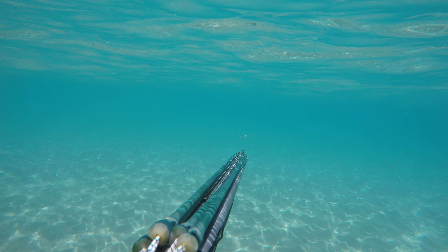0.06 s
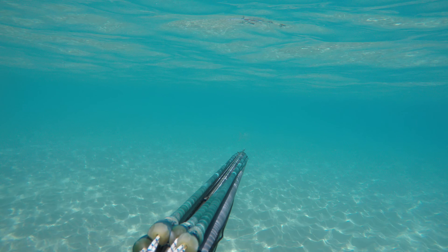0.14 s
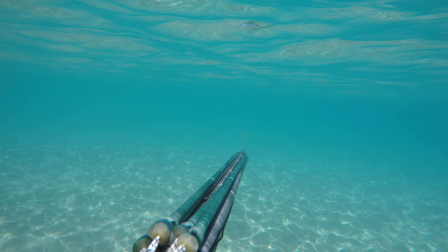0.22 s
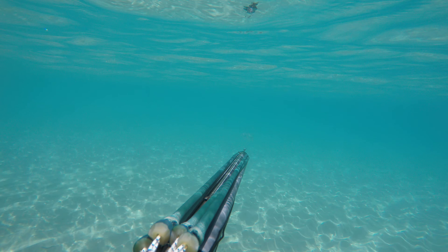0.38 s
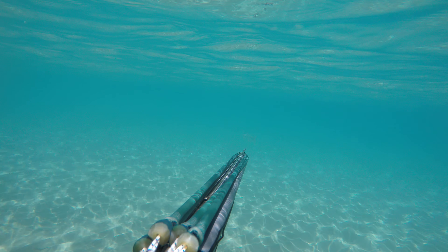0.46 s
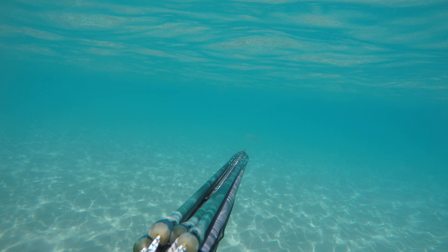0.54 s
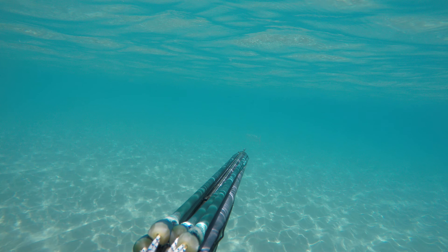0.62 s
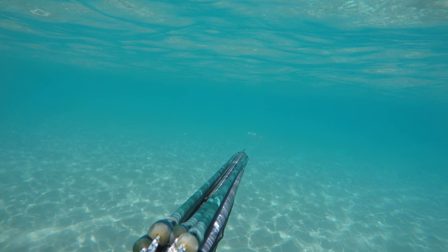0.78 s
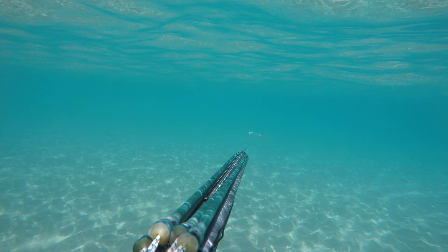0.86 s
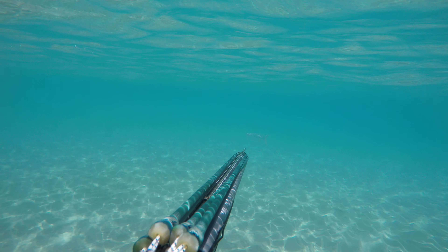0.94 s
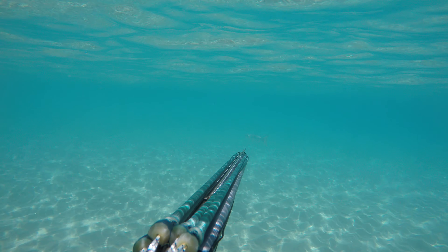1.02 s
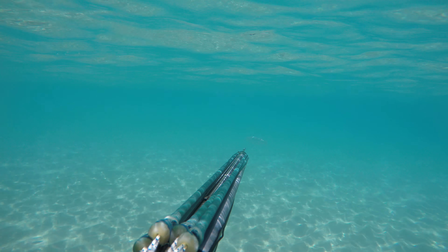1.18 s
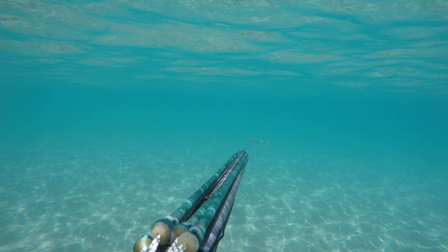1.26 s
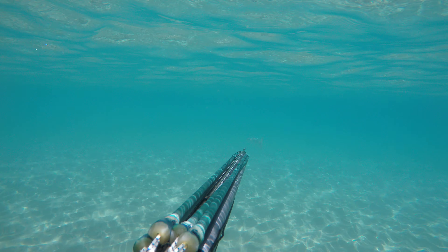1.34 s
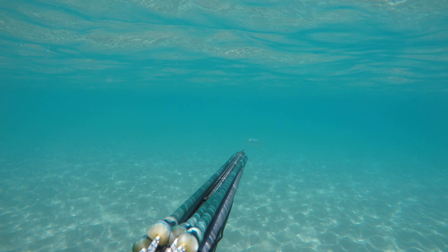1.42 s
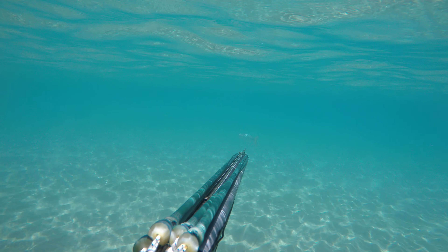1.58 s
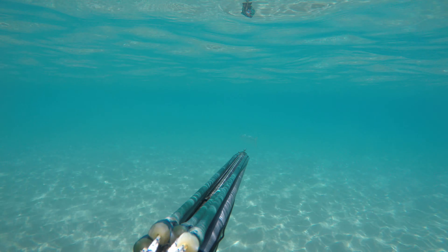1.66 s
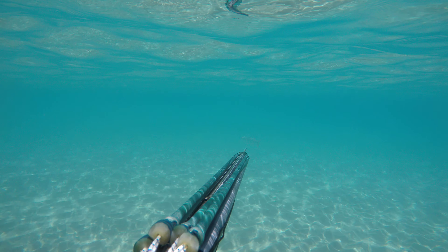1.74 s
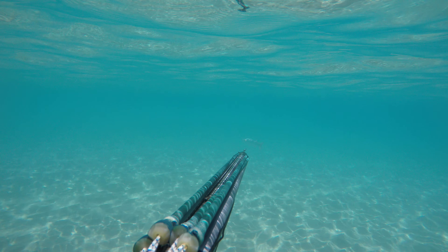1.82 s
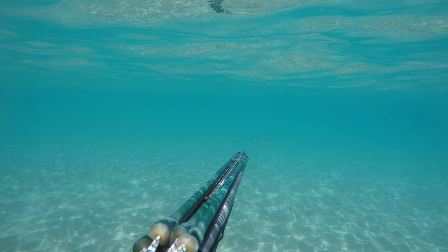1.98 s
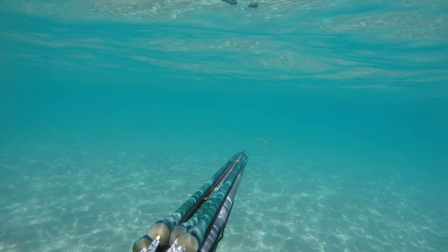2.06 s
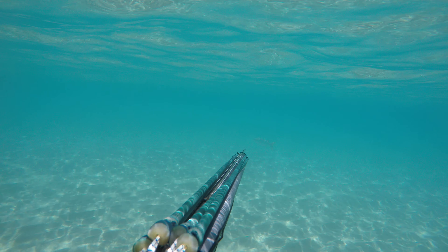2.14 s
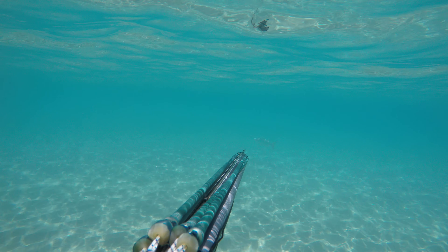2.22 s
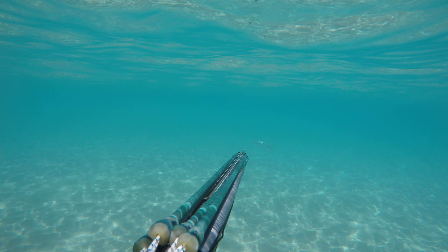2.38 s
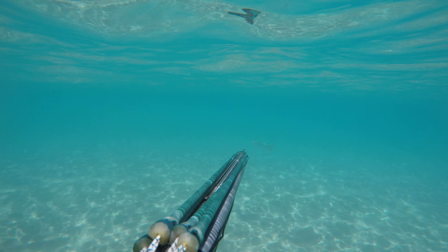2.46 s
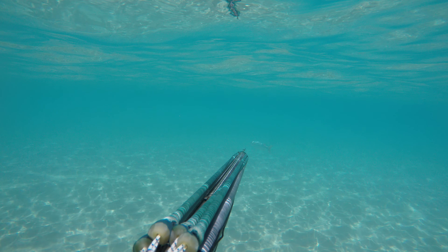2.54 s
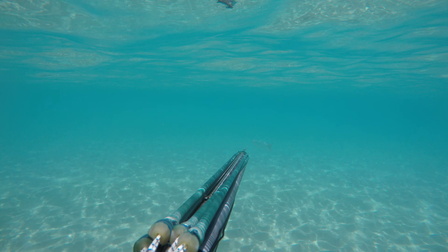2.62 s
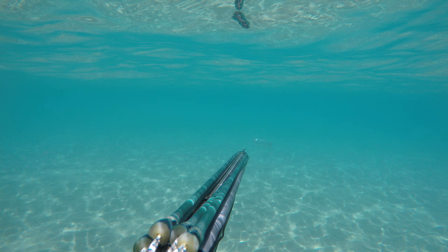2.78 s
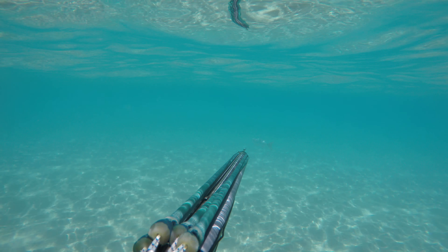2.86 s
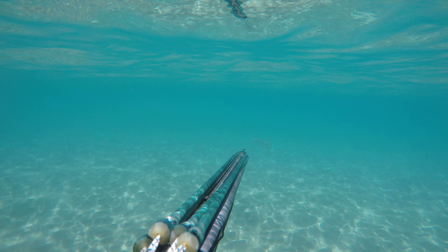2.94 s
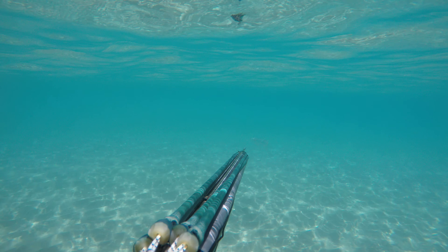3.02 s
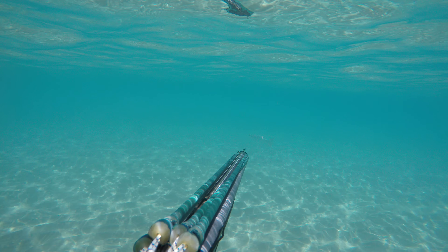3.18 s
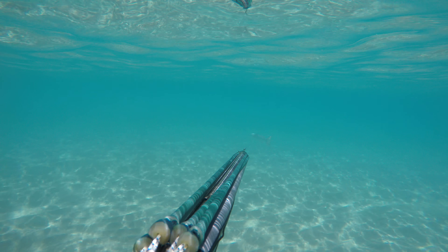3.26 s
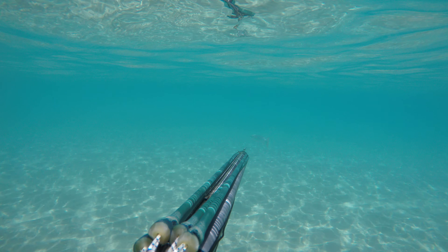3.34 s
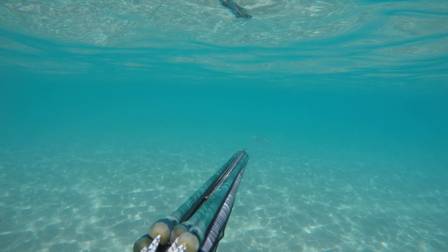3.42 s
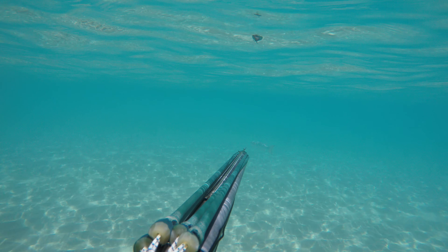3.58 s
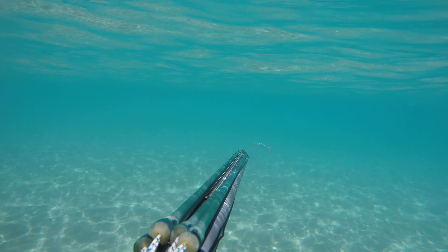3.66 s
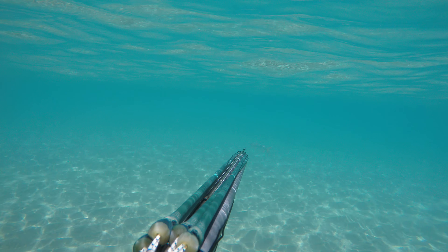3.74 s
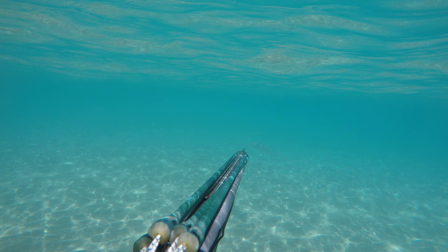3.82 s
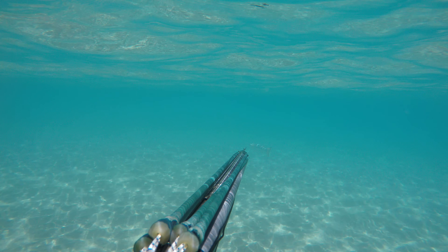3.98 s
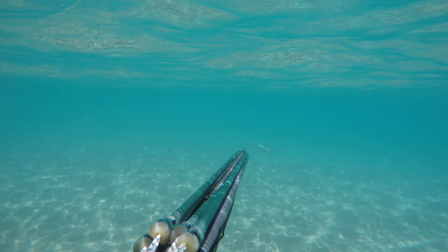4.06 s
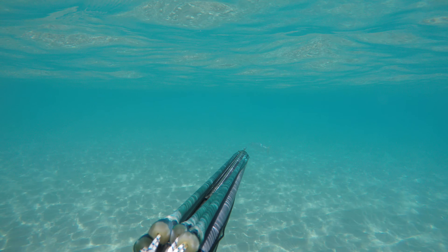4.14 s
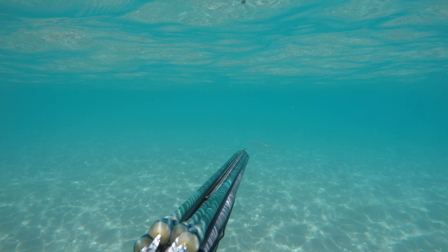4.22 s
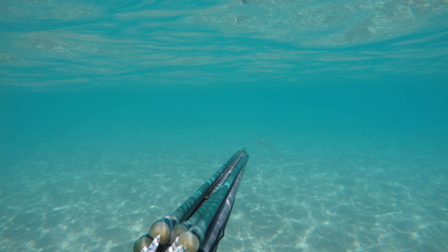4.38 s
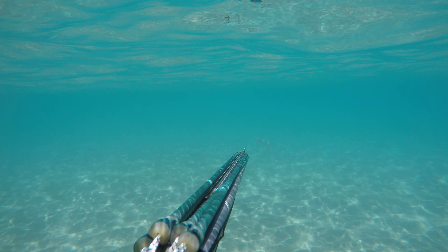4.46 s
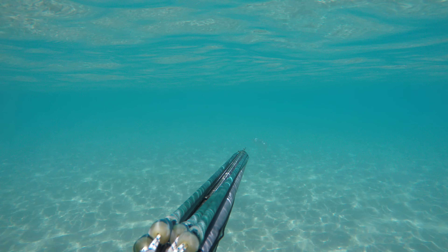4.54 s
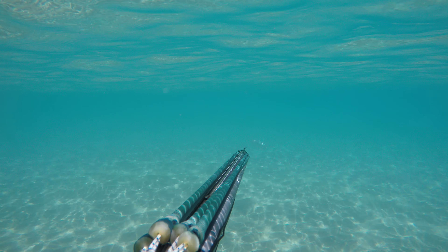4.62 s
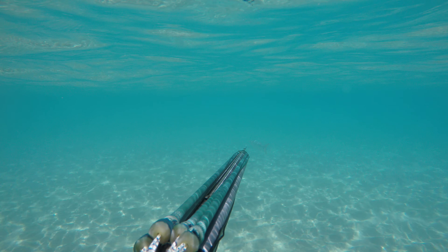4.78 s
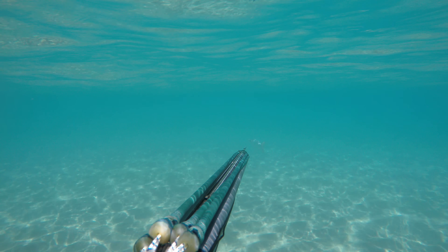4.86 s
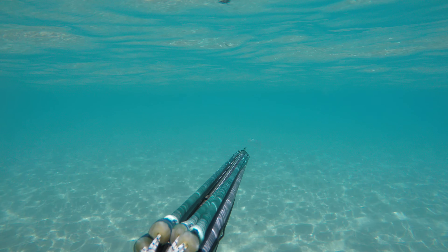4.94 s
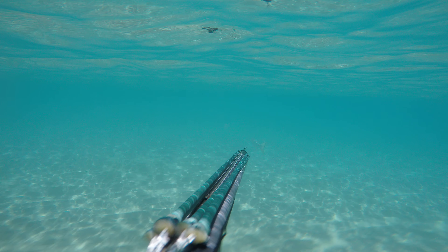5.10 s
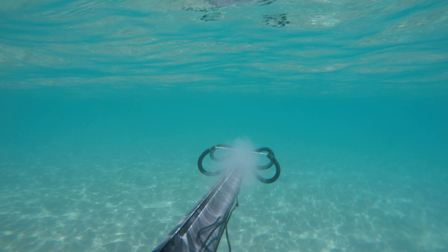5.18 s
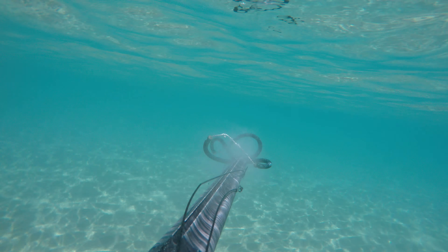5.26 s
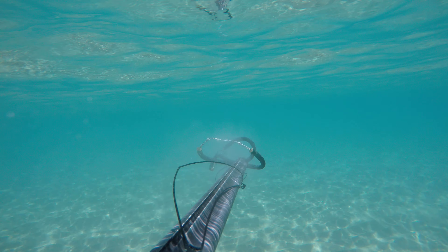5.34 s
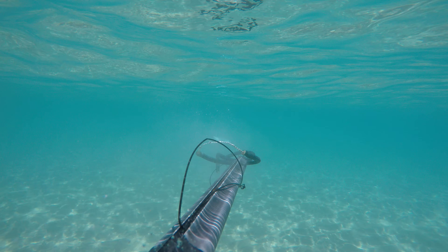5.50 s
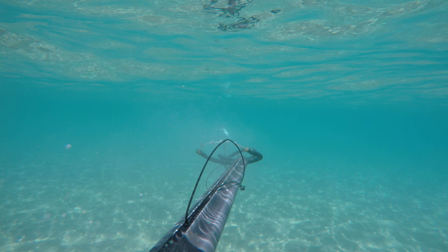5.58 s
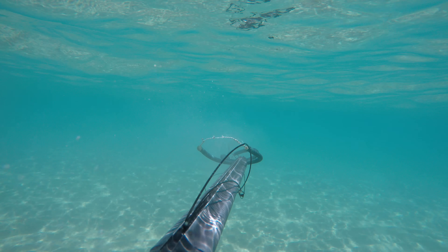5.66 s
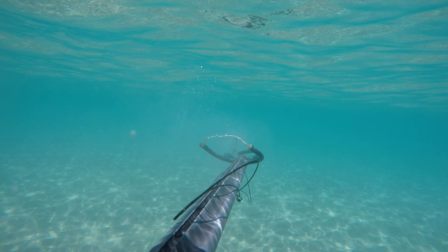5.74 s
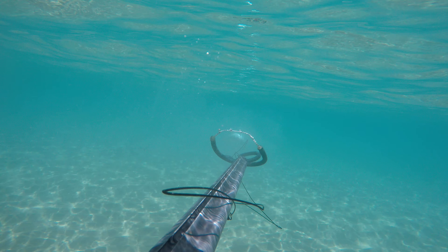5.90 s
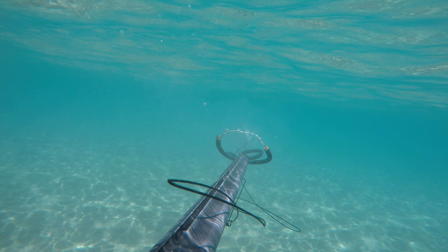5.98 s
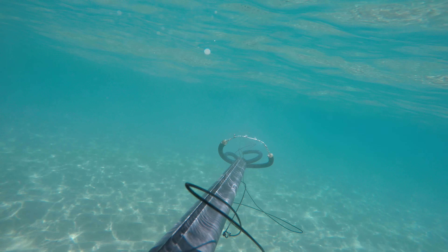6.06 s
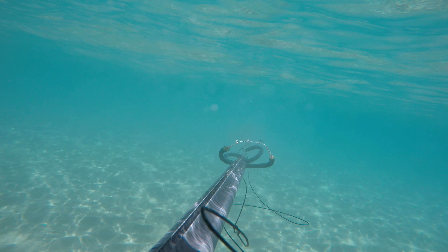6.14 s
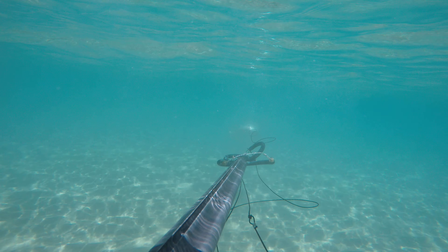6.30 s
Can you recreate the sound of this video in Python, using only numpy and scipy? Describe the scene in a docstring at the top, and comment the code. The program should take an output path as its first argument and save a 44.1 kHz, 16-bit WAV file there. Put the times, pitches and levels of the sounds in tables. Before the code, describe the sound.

Underwater, close to a camera housing on a band-powered speargun, a deep uneven rumble of pushed water sways under a thin, faint hiss. The grip rubs softly, with small knocks, a sharper clack early on and tiny bubble fizz. After about five seconds the gun fires: a very loud scraping crack with a low thump that overloads the microphone, a short rattle, then a hush with faint ticks.

```python
"""A deep rumble under water: a band-powered speargun with a camera on it sways and pushes water on the housing.
Filtered noise makes the rumble, the grip rub and a thin hiss whose resonances creep upward.
Short sines make fizz and squeaks; decaying modes make knocks; sparse impulses crackle.
The shot cracks as bursts of scraping noise, the recoil swings as three low sines and overloads the microphone,
and the shaft rattles out. The gain control ducks, so the slack line and the bands tick on in a hush."""
import sys
import numpy as np
from scipy import signal
from scipy.fft import rfft, irfft, next_fast_len
from scipy.io import wavfile
from scipy.ndimage import uniform_filter1d, map_coordinates

SR = 44100
rng = np.random.default_rng(int(sys.argv[2]) if len(sys.argv) > 2 else 0)


def materialize(psi):
    """Save the field psi as 16-bit PCM at rate SR to the path in sys.argv[1].

    A 1-D psi becomes a single channel; in a 2-D psi each row is a channel.
    """
    bounded = np.clip(np.atleast_2d(psi).T, -1, 1)
    quanta = np.round(bounded * 32767).astype(np.int16)
    wavfile.write(sys.argv[1], SR, quanta)


N = 278271
T = np.arange(N) / SR  # time [s]

# hiss level before HISS_LIFT_DB: (time [s], level [dB])
HISS_LEVEL = [(0.05, -52), (0.4, -50.5), (0.64, -51.5), (1.64, -50), (2.33, -52.5), (3.07, -54),
              (3.76, -55.5), (3.99, -56), (4.28, -54), (4.59, -57), (4.85, -58), (5.1, -58)]
# hiss resonances: (first centre [Hz], last centre [Hz], width [Hz], first relative level [dB], last [dB])
HISS_PEAKS = [(1900, 2010, 170, -14.5, -7.5), (2300, 2650, 260, -9, -0.5), (2979, 3130, 238, 2, -1),
              (3734, 3660, 240, -6, -3), (4195, 4130, 220, -7.5, -5), (4500, 5250, 380, -20.5, -8.5),
              (5450, 6050, 470, -15.5, -13.5), (6100, 6080, 320, -13.5, -15), (6580, 6750, 400, -21.5, -21),
              (7900, 9100, 930, -22.5, -15.5), (9150, 9280, 450, -28, -15),
              (11100, 12600, 1200, -24, -22.5), (14490, 14600, 900, -25.5, -25.5)]
# gun motion while aimed: (time [s], motion [dB])
AIM_MOTION = [(0.0, -29), (0.14, -16), (0.23, -31), (0.43, -12), (0.67, -18), (1.03, -13), (1.06, -21),
              (1.45, -13), (2.49, -21), (2.65, -12), (2.76, -27), (2.83, -16), (3.81, -24), (3.82, -16),
              (4.25, -27), (4.74, -19), (5.07, -23), (5.14, -11)]
# gun motion after the shot, coming to rest, then swung aside: (time [s], motion [dB])
DRIFT_MOTION = [(5.175, -21), (5.3, -18), (5.42, -23), (5.55, -34), (5.82, -37), (6.05, -19), (6.24, -11),
                (6.31, -18)]
# spectrum of the sway: (frequency [Hz], relative density [dB per Hz])
SWAY_COLOUR = [(8, -29), (17, -9), (24, 0), (31, -2.5), (40, -8), (52, -13.5), (70, -32), (120, -72.5),
               (300, -120)]
# spectrum of water flow on the housing: (frequency [Hz], relative density [dB per Hz])
FLOW_COLOUR = [(30, -31.5), (55, 2), (90, -0.5), (130, -11), (200, -19), (350, -31.5), (700, -42),
               (2000, -77.5)]
# water surges past the housing: (middle [s], half length [s], level [dB])
SURGES = [(.16, .04, -36), (.48, .1, -33), (.75, .035, -33), (1.16, .04, -30), (1.44, .025, -34),
          (2.11, .04, -31), (5.15, .03, -32), (5.3, .12, -26), (6.08, .05, -38)]
# spectrum of the grip rub: (frequency [Hz], relative density [dB per Hz])
RUB_COLOUR = [(80, -18), (200, -3), (450, -5), (580, -1.5), (690, 3), (830, -4.5), (1000, -18.5),
              (1250, -22.5), (1500, -19.5), (1700, -25), (2000, -18), (4500, -31.5), (12000, -53.5)]
# hand slides on the grip: (start [s], end [s], level [dB])
SLIDES = [(.24, .69, -47.5), (.44, .525, -42), (1.03, 1.188, -36.5), (2.72, 2.98, -54), (3.2, 3.31, -55),
          (5.09, 5.17, -52), (5.3, 5.38, -40), (6.0, 6.08, -45)]
# bubble clouds from the grip and the bands: (middle [s], half length [s], level [dB])
FIZZ = [(.5, .16, -52.5), (2.81, .06, -52), (2.95, .04, -54), (5.32, .04, -44)]
# rubber squeaks and low gulps: (middle [s], half length [s], mean pitch [Hz], relative level [dB])
SQUEAKS = [(.163, .016, 165, -31), (.604, .01, 623, -29), (.612, .005, 1900, -41.5),
           (2.828, .012, 680, -25), (2.851, .023, 654, -36.5), (2.898, .039, 700, -41.5),
           (2.956, .025, 700, -39), (5.78, .022, 159, -34.5), (5.89, .08, 653, -39)]
# crackle of the rubber bands and slack line: (middle [s], half length [s], level [dB])
CRACKLES = [(.48, .16, -51), (2.806, .07, -52.5), (2.954, .044, -55), (5.12, .03, -56), (5.348, .04, -44),
            (5.49, .056, -50), (5.665, .025, -47.5), (5.88, .03, -51), (6.05, .07, -46.5)]
# spectrum of the crackle: (frequency [Hz], relative density [dB per Hz])
CRACKLE_COLOUR = [(200, -17.5), (700, 2.5), (1100, -10.5), (1500, -6), (1700, -13.5), (2000, -2.5),
                  (4000, -12), (6000, -26.5), (15000, -51)]
# modes of the gun and camera mount: (frequency [Hz], relative level [dB], t60 [s])
GUN_MODES = [(125, -13, .05), (205, -9, 0.058), (315, -11.5, 0.044), (443, -7.5, 0.031), (544, -7.5, .025),
             (685, 0.5, 0.04), (686, -22.5, 0.23), (865, -4.5, .034), (1056, -6.5, .02), (1345, -2.5, .02),
             (1415, -33.5, .16), (1540, -8, .018), (1876, -5, .015), (2215, 0.5, .014), (2630, -6, 0.013),
             (3650, -20.5, .012), (4130, -21.5, .012)]
# knocks and ticks on the gun: (time [s], relative level [dB], treble corner [Hz])
KNOCKS = [(.239, -38, 920), (.442, -26.5, 700), (.594, -38, 700), (.665, -30, 700), (1.1897, .5, 4300),
          (1.197, -5, 850), (1.582, -42, 2500), (2.101, -39, 800), (2.558, -42, 900), (2.739, -38.5, 700),
          (2.812, -32, 700), (3.255, -40.5, 980), (4.256, -32, 720), (5.238, 6, 2400), (5.264, 9, 1200),
          (5.293, -10, 1000), (5.311, -13, 900), (5.339, -18, 1600), (5.361, -23, 1800), (5.375, -16, 810),
          (5.427, -12.5, 1500), (5.545, -23, 1000), (6.098, -19, 1000), (6.165, -26, 350)]
# scraping and cavitation bursts as the shaft leaves: (time [s], t60 [s], relative level [dB], treble corner [Hz])
SCRAPES = [(5.1756, .04, 3, 4200), (5.186, .016, 18, 4800), (5.195, .07, 9.5, 5000),
           (5.217, .03, -11, 9000), (5.23, .03, -4, 2400), (5.238, .02, 5.5, 2800), (5.247, .07, 3.5, 2400),
           (5.2632, .016, 14, 1200), (5.286, .05, -9, 4000), (5.292, .016, 2, 3000),
           (5.297, .07, -13, 1600)]
# spectrum of the scraping: (frequency [Hz], relative density [dB per Hz])
SCRAPE_COLOUR = [(100, -16.5), (300, -1.5), (520, -2.5), (720, 3.5), (1000, 2.5), (1290, 2.5), (1650, -3.5),
                 (2100, -2.5), (2900, -1.5), (4150, -8), (5500, -15), (8000, -17.5), (15000, -12)]
# recoil swings of the gun: (delay after the shot [s], frequency [Hz], starting level [dB], t60 [s])
RECOIL = [(.003, 60, 27.5, .125), (.007, 105, 19, .085), (.021, 19.5, 21, .25)]
# spectrum of the water churned by the bands: (frequency [Hz], relative density [dB per Hz])
WAKE_COLOUR = [(40, -14), (105, 5.5), (200, -2.5), (320, -0.5), (500, -7.5), (800, -18), (1500, -43.5),
               (4000, -78.5)]

SHOT_S = 5.178
HISS_LIFT_DB = 1.5
USUAL_MOTION_DB, SWAY_DB = -18, 1  # motion that leaves flow and rub levels as set; sway over motion
FLOW_DB, FLOW_DB_PER_MOTION_DB, CALMING_DB_PER_S = -38, .55, .8  # the eddies die down
RUB_DB, RUB_DB_PER_MOTION_DB = -51.5, .2
STILLING_DB_PER_S, RUB_AFTER_DB = 2.9, -47  # hand grows still while aiming, works again after the shot
BUBBLE_HZ, BUBBLE_SPREAD_OCTAVES, BUBBLE_T60_CYCLES = 2300, .33, 22
THIRD_HARMONIC_DB = -21  # over the squeak's fundamental
SCRAPE_RISE = .05  # build-up time constant as a share of t60
TOP_HZ = 15400


def amp(db):
    """Decibels to gain."""
    return 10 ** (np.asarray(db) / 20)


def unit(x):
    """Scale to rms 1."""
    return x / np.sqrt(np.mean(x ** 2) + 1e-20)


def filtered(x, response):
    """Filter x by a gain that is a function of frequency in Hz."""
    size = next_fast_len(len(x) + 8192)
    hz = np.fft.rfftfreq(size, 1 / SR)
    return irfft(rfft(x, size) * response(hz), size)[:len(x)]


def coloured(x, points):
    """Shape x by (Hz, dB) points over log frequency, at rms 1."""
    point_hz, db = np.transpose(points)
    return unit(filtered(x, lambda hz: amp(np.interp(np.log(hz + 1), np.log(point_hz), db))))


def soften(hz, corner_hz):
    """Gain of a soft contact, which loses its treble above a corner."""
    return 1 / np.sqrt(1 + (hz / corner_hz) ** 4)


def wobble(knots_per_s):
    """Smooth random curve through normally distributed knots."""
    return map_coordinates(rng.standard_normal(N // 20), [T * knots_per_s + 2], mode="wrap")


def grains(rate_per_s, spread_db):
    """Random impulses of either sign and uneven size."""
    hits = rng.random(N) < rate_per_s / SR
    return hits * rng.choice([-1, 1], N) * amp(spread_db * rng.standard_normal(N))


def swells(rows):
    """Sum of bell-shaped gains from (middle [s], half length [s], level [dB]) rows."""
    return sum(amp(db) * np.exp(-((T - s) / half_s) ** 2) for s, half_s, db in rows)


def add(track, s, sound):
    """Mix a sound in at time s, cut at the end of the track."""
    part = track[round(s * SR):][:len(sound)]
    part += sound[:len(part)]


def hiss(bed_db=-20, bed_rise_db=4, bed_tilt_db_per_octave=-4):
    """Thin noise in resonances that creep upward while the gun is aimed, over a bed tilted down above 1500 Hz."""
    hz, frame_s, spectrum = signal.stft(rng.standard_normal(N), SR, nperseg=1024)
    hz = hz[:, None]
    creep = np.interp(frame_s, [1.1, 3.3, 4.8], [0, .5, 1])
    octaves = np.log2(np.maximum(hz, 1500) / 1500)
    power = amp(bed_db + bed_rise_db * creep + bed_tilt_db_per_octave * octaves) ** 2
    for first_hz, last_hz, width_hz, first_db, last_db in HISS_PEAKS:
        centre_hz = first_hz + creep * (last_hz - first_hz)
        peak_db = first_db + creep * (last_db - first_db)
        detune = (hz - centre_hz) / width_hz
        power = power + amp(peak_db) ** 2 * .5 ** ((2 * detune) ** 2)
    shape = np.sqrt(power / power.sum(axis=0))  # even total power in each frame
    noise = signal.istft(spectrum * shape, nperseg=1024)[1][:N]
    level_db = np.interp(T, *np.transpose(HISS_LEVEL)) + HISS_LIFT_DB
    return unit(noise) * amp(level_db + .6 * wobble(25))


def gun_motion_db():
    """How hard the gun moves through the water, before and after the shot."""
    return np.interp(T, *np.transpose(np.vstack([AIM_MOTION, DRIFT_MOTION])))


def sway(motion_db):
    """The swaying gun pushes water on the housing in swings of even size and uneven length."""
    swing = signal.hilbert(coloured(rng.standard_normal(N), SWAY_COLOUR))
    evened = swing.real / np.hypot(np.abs(swing), .5)
    rumble = unit(filtered(evened, lambda hz: soften(hz, 70) ** 2))
    return amp(motion_db + SWAY_DB + .9 * wobble(18)) * rumble


def flow(effort_db):
    """Turbulent water on the housing grows with motion, calms over time and swells in surges."""
    steady = amp(FLOW_DB - CALMING_DB_PER_S * T + FLOW_DB_PER_MOTION_DB * effort_db)
    return np.hypot(steady, swells(SURGES)) * coloured(rng.standard_normal(N), FLOW_COLOUR)


def grip_rub(effort_db):
    """The grip rubs in tiny slips: noise with sparse impulses, stronger with motion."""
    level_db = np.where(T < SHOT_S, RUB_DB - STILLING_DB_PER_S * T, RUB_AFTER_DB)
    level_db = level_db + RUB_DB_PER_MOTION_DB * effort_db
    slips = rng.standard_normal(N) + .8 * unit(grains(350, spread_db=3.5))
    return amp(level_db) * coloured(slips, RUB_COLOUR) * amp(1.5 * wobble(35))


def hand_slides():
    """The hand slides on the grip: the rub's noise with its treble softened."""
    noise = coloured(rng.standard_normal(N), RUB_COLOUR)
    dull = unit(filtered(noise, lambda hz: soften(hz, 1000) ** 3))
    gain = np.zeros(N)
    for start, end, db in SLIDES:
        gain += amp(db) * np.interp(T, [start - .012, start + .017, end, end + .02], [0, 1, 1, 0])
    return gain * dull


def handling():
    """Gun motion drives the sway, flow and rub; slides keep their own times."""
    motion_db = gun_motion_db()
    effort_db = motion_db - USUAL_MOTION_DB
    return sway(motion_db) + flow(effort_db) + grip_rub(effort_db) + hand_slides()


def bubbles(count=1700, spread_db=4, rise=.12):
    """Each tiny bubble rings for a few cycles, rising in pitch; the clouds fizz."""
    out, t = np.zeros(N), np.arange(SR // 40) / SR
    starts_s = rng.random(count) * N / SR
    for s, (octaves, size) in zip(starts_s, rng.standard_normal((count, 2))):
        cycles = BUBBLE_HZ * 2 ** (BUBBLE_SPREAD_OCTAVES * octaves) * t
        age = cycles / BUBBLE_T60_CYCLES
        envelope = amp(spread_db * size - 60 * age) * (1 - np.exp(-cycles))
        add(out, s, envelope * np.sin(2 * np.pi * cycles * (1 + rise * age)))
    return unit(out) * swells(FIZZ)


def squeaks():
    """Tight rubber squeaks at a wavering pitch and level, with a weak third harmonic."""
    out = np.zeros(N)
    wavering_s = np.cumsum(1 + .0389 * wobble(160)) / SR
    for s, half_s, hz, db in SQUEAKS:
        near = np.abs(T - s) < 4 * half_s
        phase = 2 * np.pi * hz * wavering_s[near]
        tone = np.sin(phase) + amp(THIRD_HARMONIC_DB) * np.sin(3 * phase)
        out[near] += amp(db) * np.exp(-((T[near] - s) / half_s) ** 2) * tone
    return out * amp(3.7 * wobble(130))


def crackles():
    """Bands and line crackle as they shift: coloured random impulses."""
    return coloured(grains(450, spread_db=4.5), CRACKLE_COLOUR) * swells(CRACKLES)


def knocks():
    """Each contact rings the gun's modes with a noise crack; brighter ones reach the higher modes."""
    out, t = np.zeros(N), np.arange(SR // 4) / SR
    hz, mode_db, t60_s = np.transpose(GUN_MODES)[:, :, None]
    for s, db, bright_hz in KNOCKS:
        strength = amp(mode_db + 1.2 * rng.standard_normal(hz.shape)) * soften(hz, bright_hz)
        modes = np.sin(2 * np.pi * (hz * t + rng.random(hz.shape)))
        ring = (strength * amp(-60 * t / t60_s) * modes).sum(axis=0)
        burst = rng.standard_normal(len(t)) * amp(-60 * t / .014)
        crack = filtered(burst, lambda f: soften(f, bright_hz) * (1 - soften(f, 330)))
        add(out, s, amp(db) * (ring + .35 * crack) * (1 - np.exp(-t / .00083)))
    return out


def shot(wake_db=14.5, wake_t60_s=.15):
    """The shaft chatters down its track; the recoil shakes the gun and the bands churn the water."""
    out, t = np.zeros(N), np.arange(SR // 2) / SR
    for s, t60_s, db, bright_hz in SCRAPES:
        chatter = rng.standard_normal(len(t)) * amp(3.2 * wobble(450)[:len(t)])
        scrape = coloured(chatter, SCRAPE_COLOUR)
        noise = unit(filtered(scrape, lambda hz: soften(hz, bright_hz)))
        build = 1 - np.exp(-t / (SCRAPE_RISE * t60_s))
        add(out, s, noise * amp(db - 60 * t / t60_s) * build)
    for delay_s, hz, db, t60_s in RECOIL:
        add(out, SHOT_S + delay_s, amp(db - 60 * t / t60_s) * np.sin(2 * np.pi * hz * t))
    wake = coloured(rng.standard_normal(len(t)), WAKE_COLOUR)
    add(out, SHOT_S, wake * amp(wake_db - 60 * t / wake_t60_s) * (1 - np.exp(-t / .0011)))
    return out


def scene():
    """Everything sums at the one microphone in the housing."""
    background = hiss() + handling() + bubbles()
    return (background + squeaks() + crackles() + knocks() + shot())[None]


def gain_control(x, ceiling_db=3.5, release_db_per_s=.8):
    """The gain drops at once on a sustained overload and returns slowly."""
    level = np.abs(uniform_filter1d(np.abs(x), size=256))
    excess_db = np.maximum(20 * np.log10(level + 1e-9) - ceiling_db, 0)
    recovery_db = release_db_per_s * T
    return x * amp(recovery_db - np.maximum.accumulate(excess_db + recovery_db))


def record(dry):
    """The camera ducks its gain, clips smoothly near full scale and limits the band."""
    x = gain_control(dry[0])
    clipped = .97 * x / (1 + np.abs(x) ** 8) ** (1 / 8)
    return filtered(clipped, lambda hz: hz < TOP_HZ)[None]


dry = scene()
out = record(dry)
materialize(out)
```